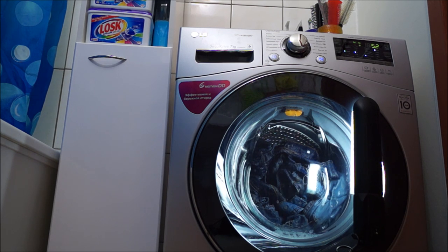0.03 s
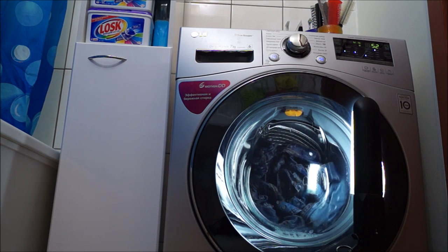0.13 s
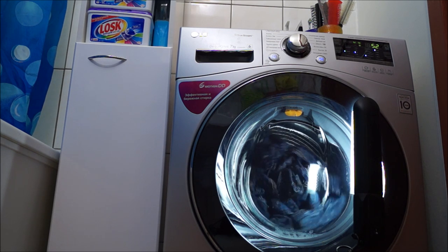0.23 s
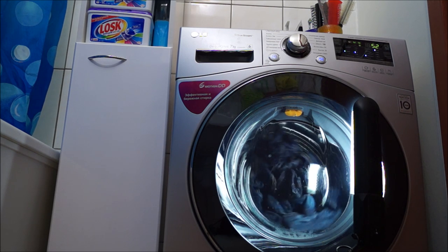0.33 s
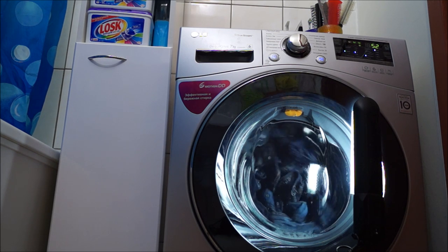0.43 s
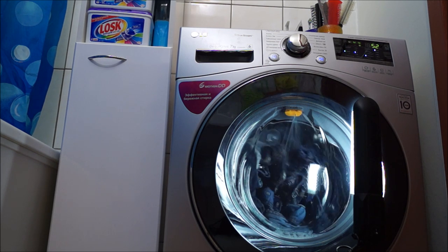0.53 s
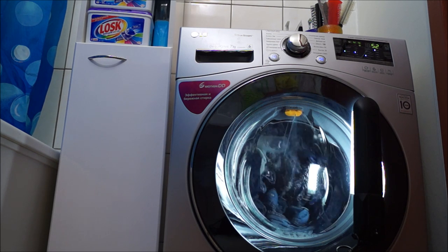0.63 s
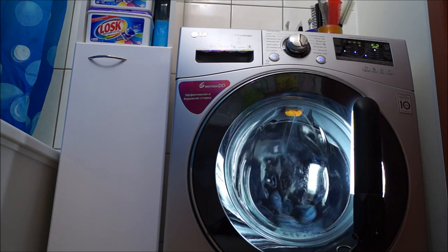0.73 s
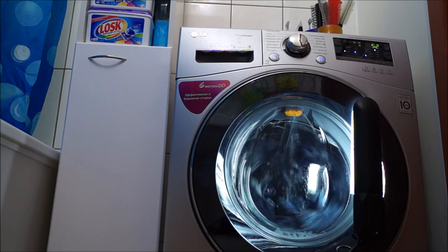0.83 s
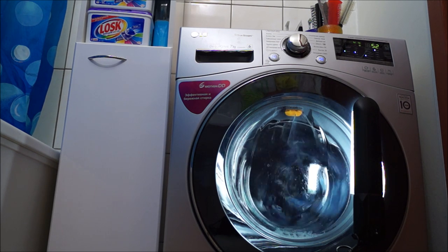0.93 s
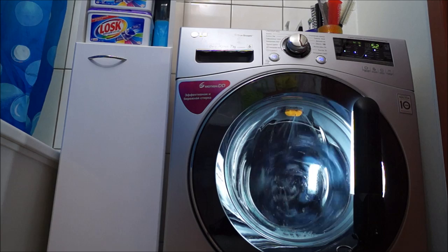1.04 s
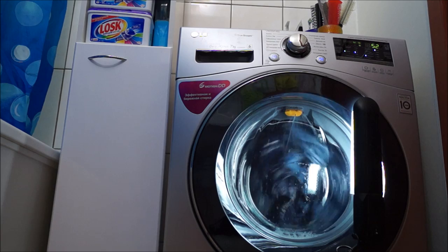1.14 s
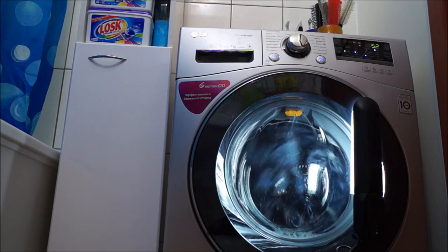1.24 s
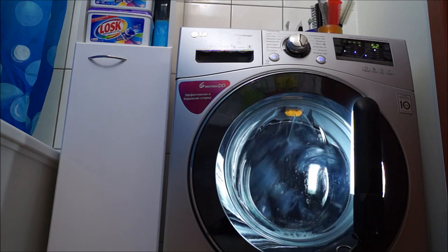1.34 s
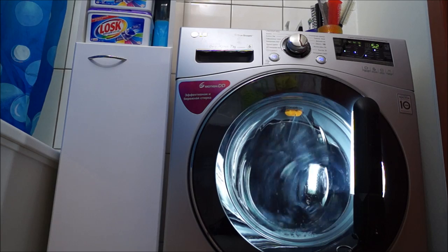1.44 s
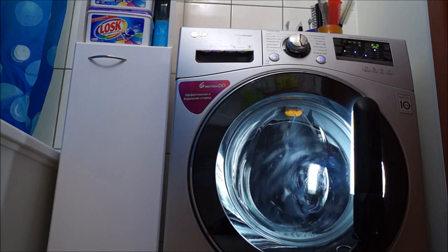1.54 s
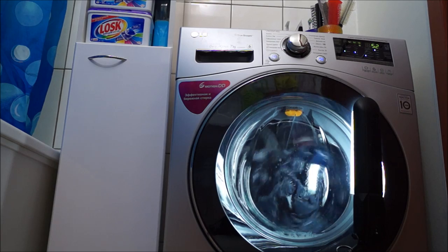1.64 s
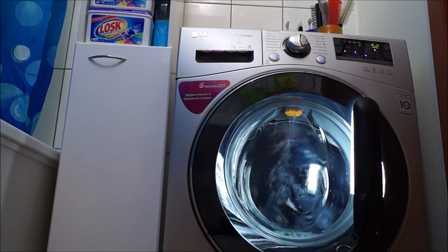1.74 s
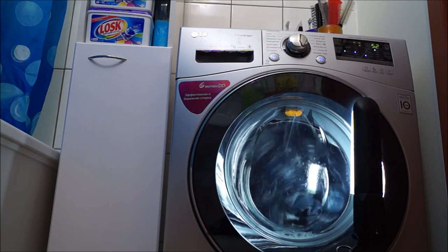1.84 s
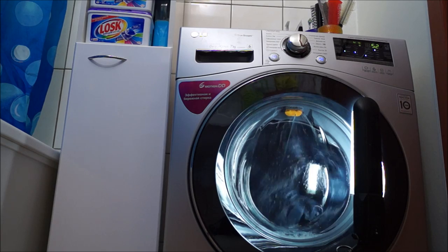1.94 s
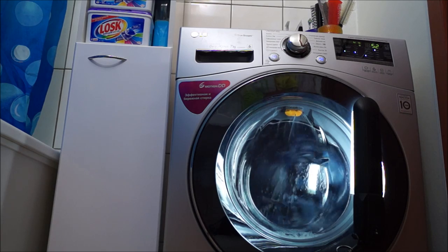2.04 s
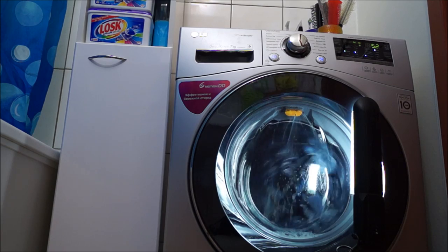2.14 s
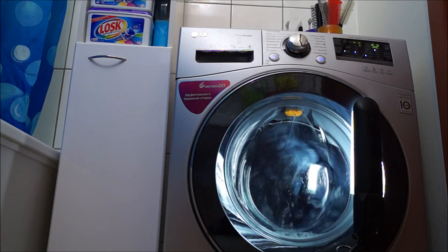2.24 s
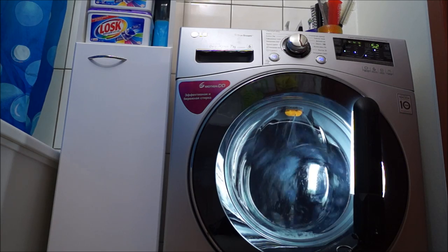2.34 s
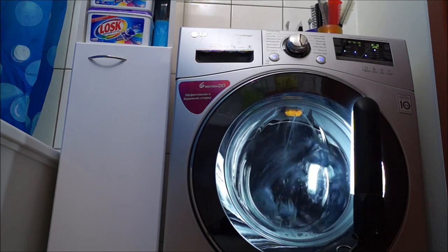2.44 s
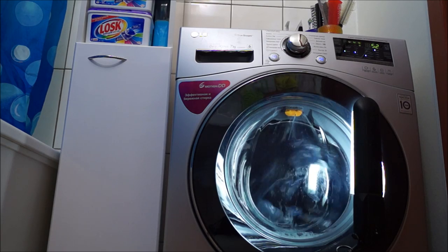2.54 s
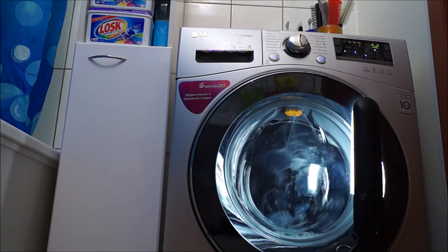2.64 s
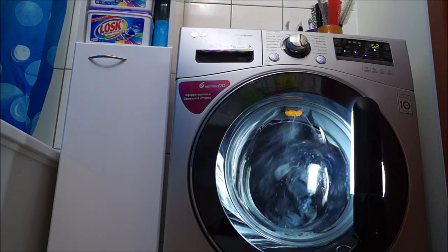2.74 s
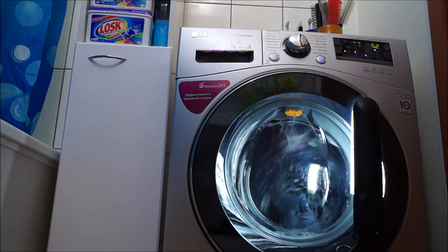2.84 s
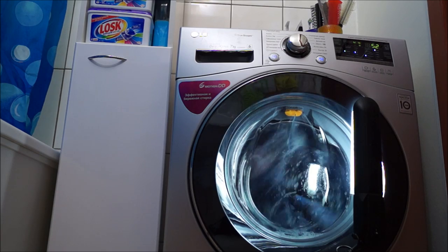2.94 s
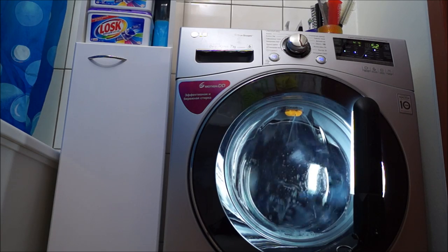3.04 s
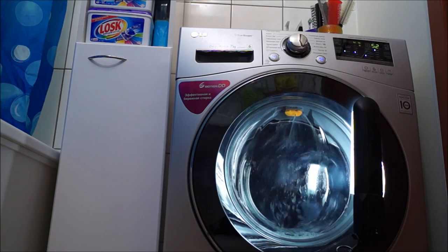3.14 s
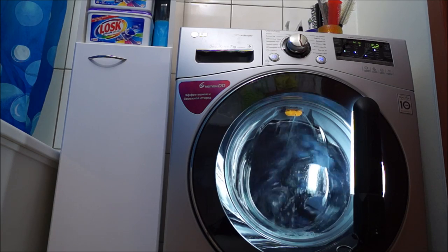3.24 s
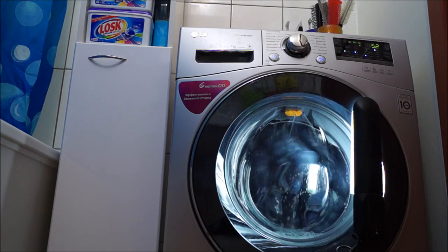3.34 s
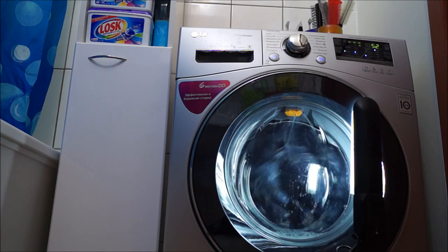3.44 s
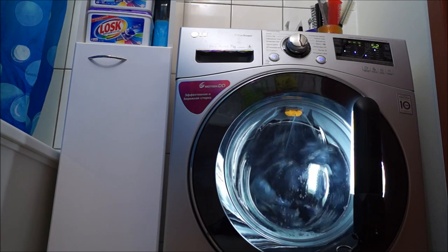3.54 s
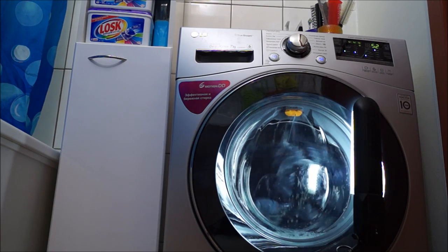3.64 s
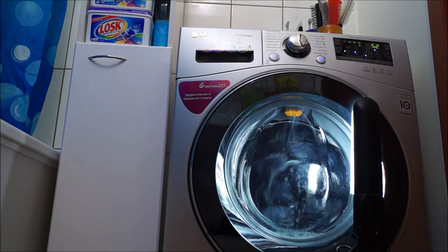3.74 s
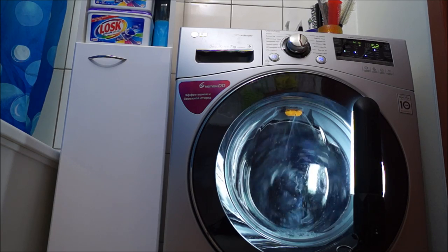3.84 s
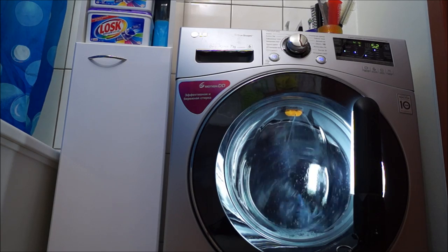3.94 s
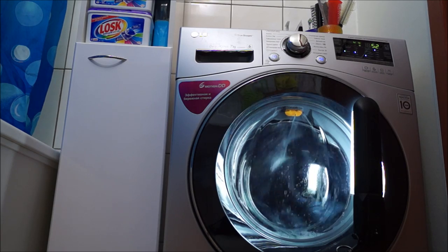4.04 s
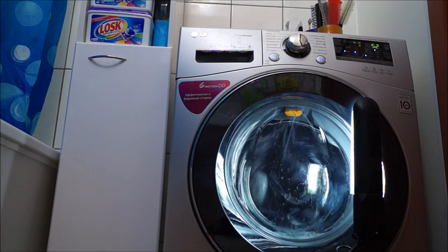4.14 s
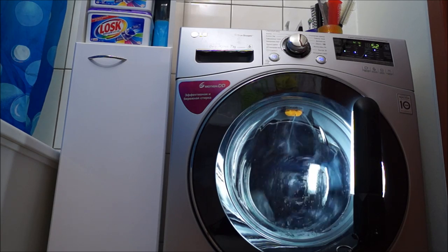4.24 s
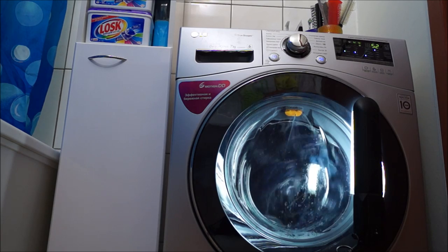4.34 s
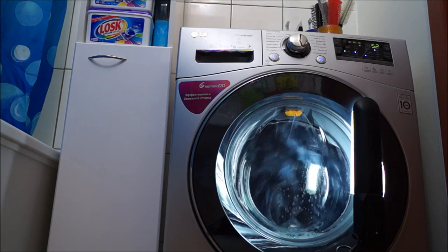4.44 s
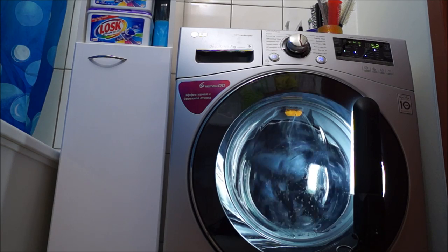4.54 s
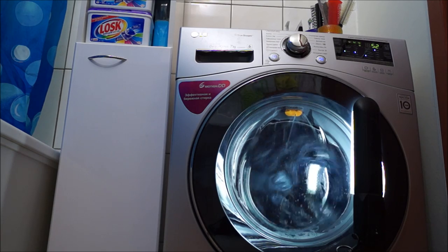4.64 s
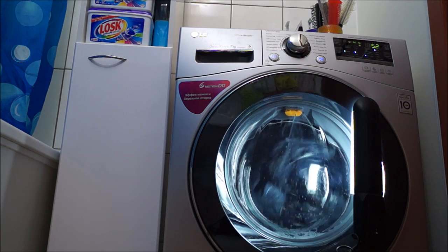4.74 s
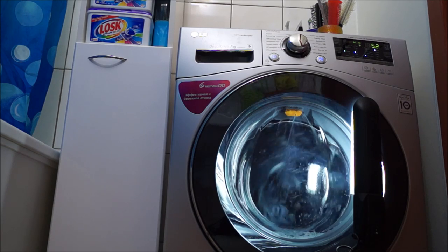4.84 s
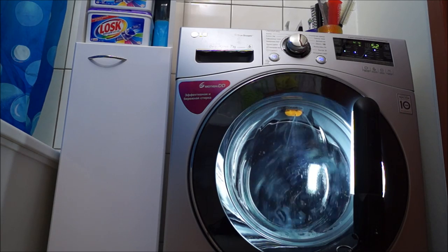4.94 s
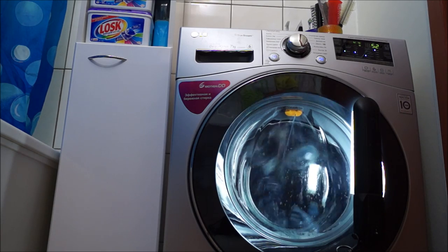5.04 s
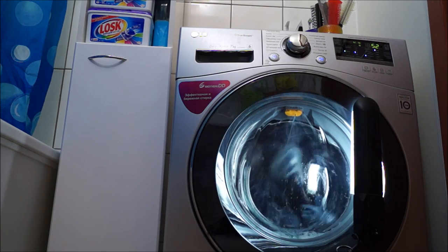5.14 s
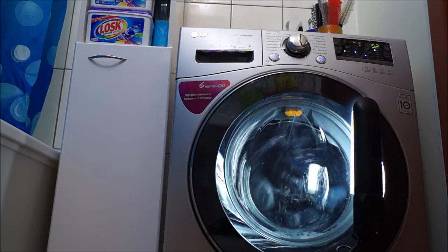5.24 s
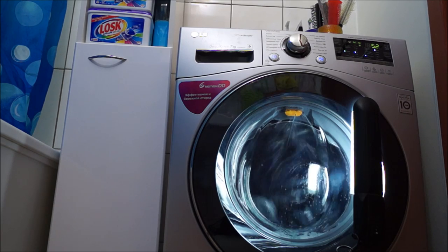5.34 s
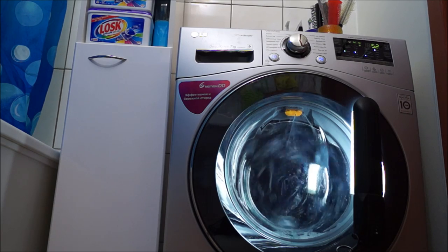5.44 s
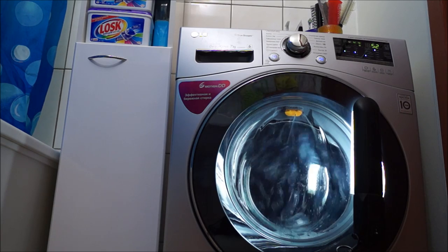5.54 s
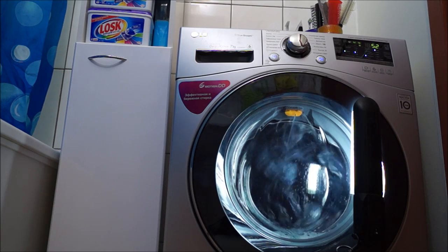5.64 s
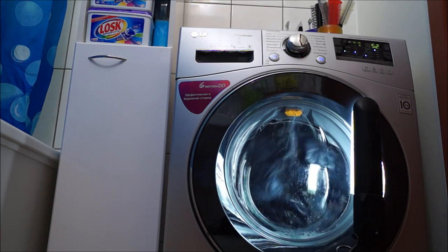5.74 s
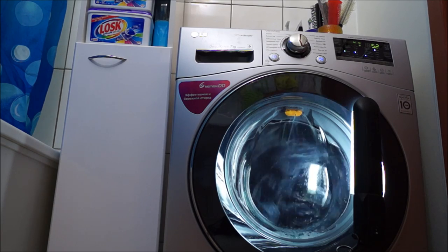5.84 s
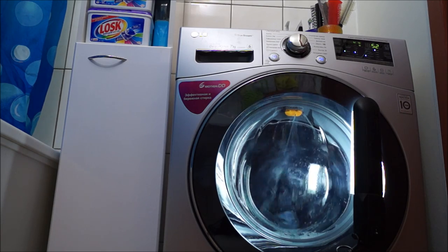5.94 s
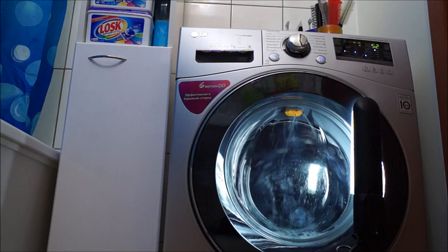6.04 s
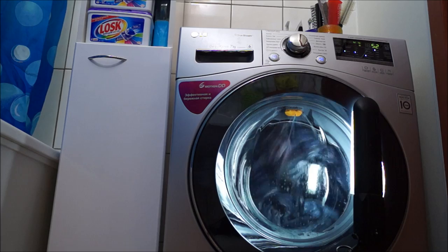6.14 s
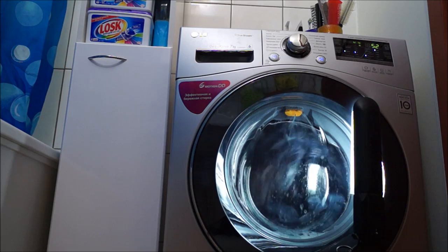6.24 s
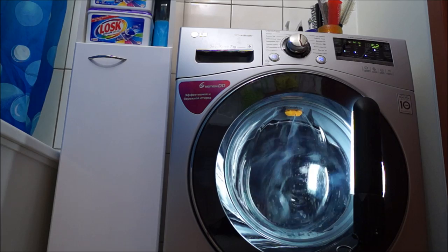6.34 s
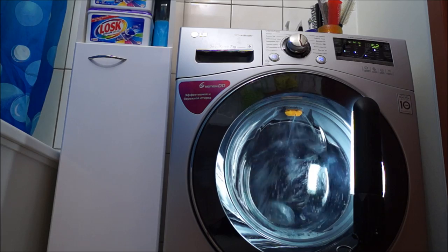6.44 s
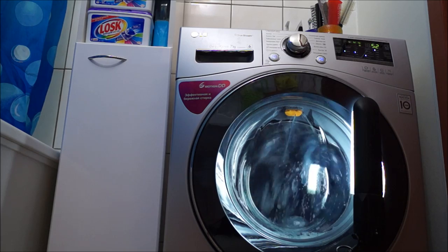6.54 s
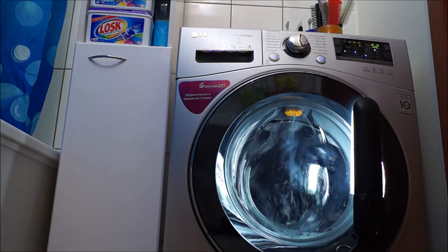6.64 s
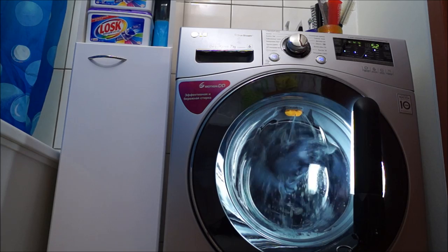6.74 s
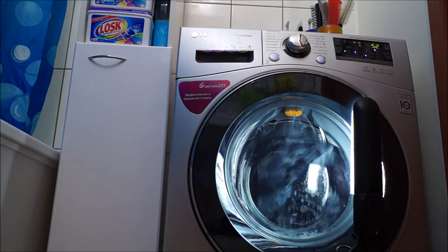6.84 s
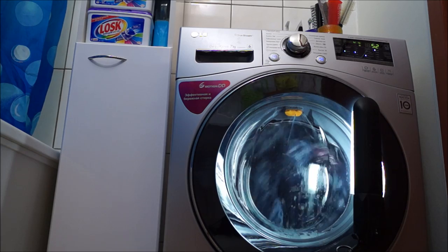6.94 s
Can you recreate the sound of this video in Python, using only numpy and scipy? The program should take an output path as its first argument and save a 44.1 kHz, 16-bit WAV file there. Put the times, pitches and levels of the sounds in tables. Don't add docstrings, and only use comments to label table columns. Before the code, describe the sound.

A front-loading washer hums and groans as wet laundry thuds and sloshes, with a buckle clatter and two sharp cracks on the door glass.

```python
import sys
import numpy as np
from scipy import signal
from scipy.fft import rfft, irfft, next_fast_len
from scipy.io import wavfile

SR = 44100
rng = np.random.default_rng(int(sys.argv[2]) if len(sys.argv) > 2 else 0)


def dump_mix(stems):
    frames = np.atleast_2d(stems).T
    limited = np.clip(frames, -1, 1)
    pcm = np.round(limited * 32767).astype(np.int16)
    wavfile.write(sys.argv[1], SR, pcm)


def invert_db(level):
    return 10 ** (np.asarray(level, dtype=float) / 20)


N = 308259
MAINS_HZ = 50

# (peak t/s, length/s, cabinet rumble level/dB, slosh level/dB)
SURGES = [(0.174, 0.07, -47, -46.5), (0.332, 0.11, -38, -59), (1.103, 0.22, -39, -55),
          (1.296, 0.16, -43, -52), (1.809, 0.43, -44, -73), (1.946, 0.081, -59.5, -58),
          (2.294, 0.15, -40.5, -53.5), (3.059, 0.086, -52, -51), (3.135, 0.11, -46, -51.5),
          (3.782, 0.061, -34, -72), (4.1, 0.15, -38.5, -58), (4.222, 0.092, -36, -55),
          (4.323, 0.16, -60, -57), (4.95, 0.49, -40.5, -60), (5.335, 0.2, -62, -57),
          (5.528, 0.057, -43, -59), (5.79, 0.13, -45, -57), (5.96, 0.16, -39.5, -71),
          (6.55, 0.19, -57, -60.5), (6.697, 0.14, -70, -58), (6.885, 0.097, -62, -60)]


def rms_one(x):
    return x / np.sqrt(np.mean(x ** 2) + 1e-20)


def at_hz(points, hz):
    point_hz, values = np.transpose(points)
    return np.interp(np.log(hz), np.log(point_hz), values)


def drift(rate):
    r = np.exp(-80 * np.pi * rate / SR)
    white = rng.standard_normal(N // 40 + 2002)
    slow = signal.lfilter([1], [1, -2 * r, r * r], white)[2000:]
    return np.interp(np.arange(N) / 40, np.arange(len(slow)), rms_one(slow))


def resonate(x, modes):
    out = 0
    for k, (hz, width, level_db) in enumerate(modes):
        r = np.exp(-np.pi * max(width, 3) / SR)
        b = (1 - r * r) / 2 * np.array([1, 0, -1])
        a = [1, -2 * r * np.cos(2 * np.pi * hz / SR), r * r]
        out = out + (-1) ** k * invert_db(level_db) * signal.lfilter(b, a, x + 1e-18)
    return out


def band(x, low_hz, high_hz):
    return signal.sosfilt(signal.butter(2, [low_hz, high_hz], "band", fs=SR, output="sos"), x)


def pair(hz, mid, side):
    # (f/Hz, likeness 0..1)
    likeness = [(60, 1), (140, 1), (340, 0.75), (820, 0.27), (1950, 0.63), (4640, 0.57), (11100, 0.71)]
    alike = np.clip(at_hz(likeness, hz), 0, 1)
    return np.sqrt(1 + alike) * mid + np.sqrt(1 - alike) * side * [[1], [-1]]


def dying(times, levels_db, t60s, rise_s):
    out = np.zeros(N)
    for s, level_db, t60 in zip(times, levels_db, t60s):
        t = np.arange(N - round(s * SR))[:SR // 2] / SR
        out[round(s * SR):][:len(t)] += invert_db(level_db - 60 * t / max(t60, .02)) * (1 - np.exp(-t / rise_s))
    return out


def swells(times, lengths, levels_db, rest_db):
    coarse = np.arange(0, N, 40)
    x = (coarse[:, None] / SR - times) / lengths
    x = np.clip(np.where(x < 0, -x / 0.93, x / 0.81), 0, 1)
    power = (invert_db(levels_db) * np.cos(np.pi / 2 * x) ** 2) ** 2
    return np.interp(np.arange(N), coarse, np.sqrt(power.sum(axis=1) + invert_db(rest_db) ** 2))


def banded_noise(spectrum, low_hz, count, patchy_db):
    out, together = 0, drift(17.0)
    edges = low_hz * 2 ** (np.arange(count + 1) / 2)
    white = rng.standard_normal((2, 2, N))
    for k, (low, high) in enumerate(zip(edges, edges[1:])):
        hz = np.sqrt(low * high)
        gain = invert_db(at_hz(spectrum, hz) + patchy_db * (together + .5 * drift(44.0)))
        out = out + gain * pair(hz, *band(white[k % 2], low, high))
    return rms_one(out)


def tone(hz, wander_hz, flutter_db):
    phase = 2 * np.pi * (np.cumsum(hz + wander_hz * drift(7.33)) / SR + rng.random())
    return np.sqrt(2) * invert_db(flutter_db * drift(4.9)) * np.sin(phase)


def quarter_turn(x):
    return signal.hilbert(x, next_fast_len(N)).imag[:N]


def startup():
    start_s = 0.053
    points_s = [0, start_s - .02, start_s, start_s + 0.004]
    return invert_db(np.interp(np.arange(N) / SR, points_s, [-20, -16, -14, -0.5]))


def water_level():
    # (t/s, level/dB)
    water = [(0.0, -73.5), (0.21, -72.5), (1.69, -71), (2.08, -69), (2.55, -69.5), (3.29, -67.5),
             (3.48, -68), (4.11, -69), (4.4, -65.5), (4.73, -68.5), (6.76, -67.5), (6.99, -68.5)]
    s, level_db = np.transpose(water)
    return np.interp(np.arange(N) / SR, s, level_db)


def faint_buzz():
    # (start t/s, length/s, level/dB)
    fourth_bouts = [
        (0.1, 0.09, -41),
        (3.005, 0.051, -41),
        (4.123, 0.13, -47),
        (5.148, 0.15, -38.5),
        (6.54, 0.036, -43),
        (6.668, 0.046, -43),
        (6.919, 0.04, -47),
    ]
    # (start t/s, length/s, level/dB)
    eleventh_bouts = [
        (3.015, 0.06, -59),
        (4.183, 0.06, -52),
        (5.184, 0.035, -42),
    ]
    out = 0
    for rows, multiple, wander_hz in [(fourth_bouts, 4, 1.7), (eleventh_bouts, 11, 3.03)]:
        s, length, level_db = np.transpose(rows)
        swell = swells(s + length / 2, length + 0.027, level_db - 2.0, -71.5)
        out = out + swell * tone(multiple * MAINS_HZ, wander_hz, flutter_db=-3.5)
    return out


def pump():
    # (multiple of the mains, rms level/dB)
    steady_buzz = [(2, -57.5), (3, -62), (4, -60), (7, -68), (9, -63), (10, -59.5), (11, -63), (17, -74.5)]
    # (start t/s, length/s, level/dB)
    sixth_bouts = [(1.04, 0.15, -38.5), (1.318, 0.021, -44), (1.678, 0.11, -39), (2.006, 0.13, -40),
                   (2.267, 0.041, -39), (2.885, 0.016, -39.5), (3.026, 0.035, -46), (3.124, 0.073, -45.5),
                   (4.012, 0.12, -38), (4.194, 0.082, -40), (4.418, 0.064, -41), (4.677, 0.098, -39.5),
                   (4.91, 0.069, -40.5), (5.111, 0.026, -40.5), (5.187, 0.059, -69), (5.288, 0.095, -40.5),
                   (5.433, 0.062, -41), (5.54, 0.039, -46), (5.979, 0.087, -39.5), (6.287, 0.036, -45),
                   (6.704, 0.11, -40.5), (6.811, 0.039, -39)]
    # (start t/s, length/s, level/dB)
    eighth_bouts = [(0.282, 0.17, -43), (0.618, 0.028, -39.5), (1.142, 0.092, -48), (1.276, 0.053, -41),
                    (1.49, 0.047, -36.5), (1.741, 0.18, -42.5), (1.965, 0.13, -39), (2.188, 0.061, -41),
                    (2.445, 0.16, -44), (2.691, 0.031, -40), (3.014, 0.2, -40.5), (3.543, 0.033, -43),
                    (3.651, 0.034, -45), (3.76, 0.16, -38), (4.01, 0.063, -50), (4.166, 0.098, -38),
                    (4.323, 0.036, -52.5), (4.589, 0.25, -39.5), (4.898, 0.051, -40), (5.267, 0.11, -39.5),
                    (5.429, 0.25, -40.5), (5.71, 0.11, -45), (5.86, 0.069, -42), (5.975, 0.17, -41.5),
                    (6.277, 0.042, -39.5), (6.373, 0.27, -40.5)]
    out = 0
    for k, level_db in steady_buzz:
        out = out + invert_db(level_db) * tone(k * MAINS_HZ, wander_hz=0.148 * k, flutter_db=4.5)
    s, length, level_db = np.transpose(sixth_bouts)
    sixth = swells(s + length / 2, length + 0.023, level_db - 3.0, rest_db=-54)
    s, length, level_db = np.transpose(eighth_bouts)
    eighth = swells(s + length / 2, length + 0.012, level_db - 3.0, rest_db=-53.5)
    out = out + sixth * tone(6 * MAINS_HZ, wander_hz=2.03, flutter_db=3.0)
    return out + eighth * tone(8 * MAINS_HZ, wander_hz=1.4, flutter_db=0.03)


def groans():
    # (peak t/s, length/s, peak level/dB, f/Hz)
    low_bouts = [(.22, 0.14, -41, 112.4), (1.06, 0.12, -47, 119), (1.48, 0.096, -36, 119.2),
                 (1.70, 0.24, -41.5, 115.3), (2.01, 0.24, -40.5, 118.2), (2.92, 0.14, -37.5, 116),
                 (3.09, 0.11, -28, 117.2), (3.28, 0.24, -42.5, 119.4), (3.51, 0.16, -44.5, 115.3),
                 (4.07, 0.11, -36.5, 116), (4.25, 0.21, -36.5, 116.8), (4.54, 0.077, -34.5, 113.6),
                 (4.9, 0.11, -39.5, 113.9), (5.17, 0.078, -41, 118.7), (5.32, 0.18, -32, 118.5),
                 (5.55, 0.26, -49, 121), (5.73, 0.23, -45, 108.3), (5.94, 0.11, -39, 111.9),
                 (6.2, 0.16, -43.5, 112), (6.43, 0.16, -43, 112), (6.68, .26, -37.5, 116)]
    # (peak t/s, length/s, peak level/dB, f/Hz)
    high_bouts = [(.138, 0.037, -32.5, 158.2), (.38, 0.26, -45, 158.2), (.79, 0.12, -41, 170),
                  (.97, 0.11, -39, 156.7), (1.02, .05, -33, 158.4), (1.1, 0.091, -24, 166.6),
                  (1.155, 0.026, -25, 169.5), (1.97, 0.1, -50, 157.8), (2.28, 0.12, -38, 158.1),
                  (2.47, 0.48, -41.5, 151), (2.97, 0.23, -42, 171.5), (3.2, 0.061, -37, 147),
                  (3.62, 0.12, -41.5, 160.3), (3.78, 0.3, -36.5, 158.6), (4.22, 0.21, -38.5, 171.2),
                  (4.52, 0.12, -42, 167.2), (4.85, 0.44, -48.5, 165), (5.02, 0.22, -36, 164.8),
                  (5.11, .07, -38, 165.7), (5.65, 0.36, -42.5, 165), (5.8, .1, -47, 156),
                  (6.0, .1, -46, 165), (6.29, 0.17, -37, 163), (6.47, 0.29, -39, 169.3),
                  (6.76, 0.14, -44.5, 169.3), (6.92, 0.3, -37.5, 158.6)]
    out = 0
    for rows in (low_bouts, high_bouts):
        s, length, level_db, hz = np.transpose(rows)
        swell = swells(s, length, level_db - 4.0, rest_db=-65)
        swell = np.minimum(swell, invert_db(-33.0))
        out = out + swell * tone(np.interp(np.arange(N) / SR, s, hz), wander_hz=1.372, flutter_db=1.5)
    return out


def spray(water_db):
    # (f/Hz, density/dB per Hz)
    hiss_colour = [(820, -30), (1400, 4.5), (1700, -2.5), (3200, -8), (3610, -8), (8050, -15), (10500, -15),
                   (11200, -24), (14600, -54), (22000, -120)]
    return invert_db(water_db + 4.5) * banded_noise(hiss_colour, 1344, count=6, patchy_db=1.06)


def slosh(fill_db):
    # (f/Hz, density/dB per Hz)
    slosh_colour = [(24, -52), (40, -20), (97, 2.5), (134, -1.5), (241, -4.5), (299, -4), (348, -11),
                    (405, 0.5), (703, -16), (846, -16.5), (2200, -35.5), (2860, -66), (4840, -120)]
    s, length, _, level_db = np.transpose(SURGES)
    surge = invert_db(0.94 * fill_db + 13.5) * swells(s, length, level_db, rest_db=-59.5)
    wash = surge * banded_noise(slosh_colour, 44.0, count=11, patchy_db=1.86)
    return signal.sosfilt(signal.butter(6, 2050, fs=SR, output="sos"), wash)


def cabinet(fill_db, opening):
    # (t/s, peak level/dB, ring/s)
    thuds = [(0.136, -52, 0.11), (1.069, -30.5, 0.071), (1.162, -38, .05), (1.201, -36, 0.055),
             (1.276, -36, 0.16), (1.95, -53, 0.17), (2.269, -46, 0.15), (2.294, -31, 0.054),
             (3.0186, -22, 0.13), (4.193, -20, 0.06), (4.2075, -28, 0.05), (4.225, -32, 0.05),
             (4.237, -43, .06), (5.176, -26.5, 0.11), (5.743, -36, 0.15), (6.528, -33, 0.31),
             (6.691, -42, 0.17)]
    # (f/Hz, width/Hz, level/dB)
    panels = [(63.4, 4.6, -33), (86, 5.3, -6.5), (116, 54, -4), (156, 53.4, -7), (202, 14, 0),
              (262.8, 26.5, -3.5), (297.3, 33.3, -0.5), (332.6, 29.5, -3.5), (409.5, 24.6, 3),
              (443, 56.8, 0.5), (491, 51.7, -3.5), (567.6, 59, -9), (614, 140, -21), (777.3, 9.5, -12.5),
              (848, 21, -17.5)]
    s, length, level_db, _ = np.transpose(SURGES)
    rumble = invert_db(0.34 * fill_db) * swells(s, length, level_db, rest_db=-42)
    s, level_db, t60 = np.transpose(thuds)
    force = rumble * invert_db(-5.0 + 3.05 * drift(24.0)) * opening
    force = force + dying(s, level_db - 18.5, t60, rise_s=0.0051)
    size = np.sqrt(np.mean(resonate(rng.standard_normal(SR), panels) ** 2))
    mid, side = resonate(force * rng.standard_normal((2, N)), panels) / size
    push = band(dying(s, level_db, .012 + 0 * s, rise_s=0.00031), 78, 1100)
    shudder = invert_db(-15.5) * resonate(push, panels) / size
    return pair(140, mid, side) / np.sqrt(2) + shudder + invert_db(7.0) * band(push, 120, 600)


def splashes():
    # (peak t/s, length/s, dull level/dB, bright level/dB)
    sheets = [(0.497, .03, -61, -79), (0.521, 0.036, -57, -59), (0.715, 0.027, -64, -71),
              (1.08, 0.034, -73, -78), (1.13, 0.041, -70, -77), (1.23, 0.023, -61, -77),
              (1.275, 0.037, -57, -73), (1.336, 0.037, -56, -70), (1.66, 0.049, -62.5, -70),
              (2.939, 0.024, -53, -67), (3.3, .04, -69, -72), (4.05, 0.054, -64, -72),
              (4.515, .08, -56, -73), (5.695, .06, -54, -72), (5.872, 0.054, -57, -68),
              (6.017, 0.034, -60, -69), (6.156, 0.044, -61, -72), (6.34, 0.049, -69, -76),
              (6.539, 0.054, -55, -75), (6.719, 0.064, -62, -75), (6.788, 0.024, -54.5, -67)]
    s, length, dull_db, bright_db = np.transpose(sheets)
    drops_per_s = 2500
    drops = rng.standard_normal((2, N)) * (.3 + (rng.random((2, N)) < drops_per_s / SR) * 3.0)
    dull = rms_one(pair(1300, *band(band(drops, 550, 1720), 550, 1720)))
    bright = rms_one(pair(4600, *band(drops[::-1], 2300, 5800)))
    return swells(s, length, dull_db, -90) * dull + swells(s, length, bright_db, -96) * bright


def drips():
    # (t/s, peak level/dB, f/Hz)
    gulps = [(0.4795, -48, 1090), (1.0627, -51, 1160), (1.2159, -52, 1000), (1.6514, -52, 1020),
             (2.0624, -49, 931), (2.2405, -35, 1310), (2.7993, -53, 1030), (3.0168, -43, 2290),
             (3.2208, -49, 910), (3.4079, -46, 1530), (4.2949, -32, 2270), (4.4989, -48, 1220),
             (4.7947, -47, 921), (4.9698, -49, 1030), (5.1689, -40, 2270), (5.3066, -27, 2260),
             (5.6328, -46, 985), (5.8603, -48, 1020), (5.9995, -49, 1310), (6.5163, -46, 950),
             (6.655, -46, 926), (6.7757, -49, 1060)]
    out, t = np.zeros(N + SR), np.arange(SR // 8) / SR
    for s, level_db, hz in gulps:
        fall_db = 60 * t * hz / 42
        fall = invert_db(min(level_db, -50.0) - 5 - fall_db) * (1 - np.exp(-t / .0015))
        out[round(s * SR):][:len(t)] += fall * np.sin(2 * np.pi * hz * t * (1 + 1.5 * t))
    return out[:N]


def tub():
    # (t/s, peak level/dB, f/Hz)
    knocks = [(0.176, -30.5, 486), (0.289, -39, 425), (0.316, -43, 498), (1.071, -31, 507),
              (1.153, -34, 464), (1.168, -34, 526), (1.202, -31.5, 431), (1.278, -27.5, 490),
              (1.329, -38, 426), (1.479, -45, 416), (1.644, -42, 495), (1.959, -37, 522), (2.062, -38, 500),
              (2.269, -28, 458), (3.02, -30.5, 346), (3.035, -33, 436), (3.408, -33.5, 499),
              (4.1935, -30, 470), (4.2085, -26, 515), (4.2275, -30, 400), (4.2365, -27, 425),
              (5.174, -28, 431), (6.145, -36, 500), (6.338, -38, 540), (6.536, -45, 433), (6.689, -43, 520)]
    out, t = np.zeros(N + SR), np.arange(SR // 4) / SR
    for s, level_db, hz in knocks:
        peak_db = level_db - 2.5
        ring = invert_db(peak_db - 60 * t / 0.09) * (1 - np.exp(-t / 0.00056)) * np.sin(2 * np.pi * hz * t)
        overtone = invert_db(peak_db - 8.5 - 60 * t / 0.035) * np.sin(2 * np.pi * 1.327 * hz * t)
        out[round(s * SR):][:len(t)] += ring + overtone
    return out[:N]


def slaps():
    # (t/s, peak level/dB, dull part level/dB, dying/s, ring f/Hz)
    heavy_slaps = [
        (0.0585, -40.5, 6, 0.12, 4100),
        (0.08, -39, 6.5, 0.43, 3820),
        (0.1285, -32, -1, 0.16, 6240),
        (0.479, -62.5, 19.5, 0.49, 3700),
        (0.519, -51, 10, 0.25, 4400),
        (2.242, -48, 20, 0.24, 3700),
        (2.2897, -57.5, 15, 0.44, 4000),
        (3.0164, -45, -7, 0.16, 4850),
    ]
    # (t/s, peak level/dB, dull part level/dB)
    spatters = [(0.3347, -58, -17), (0.715, -58, 10), (0.851, -57, -4), (1.071, -70, 13), (1.089, -52, -9),
                (1.262, -69, 1), (1.3143, -53.5, 12), (1.687, -51, -12), (1.951, -66, 15),
                (2.768, -56, -16), (2.94, -62, 18), (3.06, -49, -16.5), (3.22, -45.5, -7), (3.755, -52, 9),
                (4.143, -44.5, 0), (4.1918, -68, 8), (4.5614, -45.5, 0), (4.9641, -48.5, 6),
                (5.254, -50, -11), (5.6068, -52, 4), (5.6293, -44.5, 3.5), (5.999, -48.5, 2),
                (6.365, -48.5, 5), (6.6904, -61.5, 21), (2.064, -47, 3), (3.4125, -48, 6.5),
                (4.43, -44.5, -9), (4.794, -43, 2.5), (5.147, -51, -9), (6.6115, -45, -42)]
    light = [(*row, 0.17, 4180, 0) for row in spatters]
    out, t = np.zeros(N + SR), np.arange(SR // 2) / SR
    for s, level_db, dull_db, t60, hz, steel in [(*row, 1) for row in heavy_slaps] + light:
        white = rng.standard_normal((2, len(t))) * invert_db(0.39 * drift(170.0)[:len(t)])
        spatter = rms_one(band(white[0], 1250, 10800 - 4500 * steel))
        ring = rms_one(resonate(white[0], [(hz, 450, 0)]))
        bright = (1 - 0.078 * steel) * spatter + (0.075 + 0.27 * steel) * ring
        dull = rms_one(band(band(white[1], 440, 1840), 440, 1840))
        fall = invert_db(-60 * t / max(t60, .02)) * (1 - np.exp(-t / 0.00032))
        out[round(s * SR):][:len(t)] += invert_db(level_db - 12.0) * fall * (bright + invert_db(dull_db + 0.5) * dull)
    return out[:N]


def crack(blows, modes, t60, gain_db, hard=0.38, tick_s=0.064, spike_db=-60, click_db=-40):
    s, level_db = np.transpose(blows)
    heard = slice(round(s[0] * SR), round((s[-1] + .5) * SR))
    rattle = dying(s, level_db - 2.5, t60 + 0 * s, rise_s=0.00087)
    rattle = rattle + dying(s, level_db + 3, tick_s + 0 * s, rise_s=0.000043)
    tail = dying(s, level_db + 4, 1.4 * t60 + 0 * s, rise_s=0.0022)
    spike = dying(s, level_db + spike_db, 0.013 + 0 * s, rise_s=0.0002)
    white, out = rng.standard_normal((2, N)), np.zeros(N)
    blow = white[0] * rattle
    blow[np.round(s * SR).astype(int)] += invert_db(level_db + click_db)
    body = resonate(blow[heard], modes) / np.std(resonate(white[0, :SR // 4], modes))
    dense = band((white[0] * rattle + white[1] * tail)[heard], 1850, 5400)
    out[heard] = body + hard * dense + band((white[1] * spike)[heard], 2500, 16000)
    return invert_db(gain_db) * out


def opening_knocks():
    # (t/s, peak level/dB)
    opening_hits = [
        (0.0582, -38.5),
        (0.0823, -46),
        (0.1287, -48),
    ]
    # (f/Hz, width/Hz, level/dB)
    opening_ring = [(1800, 180, 0), (2960, 330, -9), (3600, 120, -1), (3940, 190, 3), (4300, 120, 3),
                    (5760, 220, -18.5), (6660, 400, -12), (7500, 300, -13)]
    return crack(opening_hits, opening_ring, 0.13, gain_db=-8.0, hard=0.089, tick_s=.05, click_db=16.0)


def buckle():
    # (t/s, peak level/dB)
    drum_hits = [
        (2.2365, -45),
        (2.243, -48),
        (2.262, -54),
        (2.294, -65),
    ]
    # (f/Hz, width/Hz, level/dB)
    drum_ring = [(1050, 940, -10), (1550, 370, 2), (2060, 520, -14), (3700, 290, -2), (4110, 570, -8),
                 (4750, 510, -33)]
    return crack(drum_hits, drum_ring, 0.21, gain_db=-12.5, hard=.04, click_db=9.0)


def glass_knocks():
    # (t/s, peak level/dB)
    soft_knocks = [
        (3.0168, -49.5),
        (5.1673, -45.5),
    ]
    # (f/Hz, width/Hz, level/dB)
    soft_ring = [(1535, 49, 8.5), (1870, 24, 4), (2210, 31.3, 6.5), (2403, 50, 6), (4046, 170, -15),
                 (5320, 110, -16)]
    # (t/s, peak level/dB)
    thud_knock = [
        (4.191, -44),
        (4.2075, -60),
        (4.225, -63),
    ]
    # (f/Hz, width/Hz, level/dB)
    thud_ring = [(853, 73, -9), (1280, 90, -5), (1500, 70, 5), (2150, 90, -8), (2550, 70, -4)]
    soft = crack(soft_knocks, soft_ring, 0.3, gain_db=-5.5, hard=.02, click_db=22.0)
    return soft + crack(thud_knock, thud_ring, 0.1, gain_db=-10.5, hard=.03, click_db=19.0)


def fastener():
    # (t/s, peak level/dB)
    graze = [
        (4.2775, -34),
        (5.3005, -35),
    ]
    # (t/s, peak level/dB)
    first_blows = [
        (4.2947, -16.5),
        (4.2995, -28),
    ]
    # (t/s, peak level/dB)
    later_blows = [
        (5.3056, -20),
    ]
    # (t/s, peak level/dB)
    last_blows = [
        (6.6553, -40.5),
    ]
    # (f/Hz, width/Hz, level/dB)
    first_ring = [(1470, 380, 4), (2310, 250, 7), (3420, 600, -16), (4150, 1030, 6), (5050, 450, 10.5),
                  (6140, 200, 10), (6800, 640, 4.5), (7600, 170, 9.5), (9200, 330, 8), (10270, 730, -2)]
    later_ring = [(1530, 210, 0), (1793, 52, 0), (2214, 37, 12), (2420, 73, 9), (3390, 28, 12.5),
                  (3660, 50, 9), (3830, 180, -4), (4830, 150, 5.5), (5120, 160, 2.5), (6250, 170, -3),
                  (5780, 85, 6), (7500, 350, -0.5), (8900, 500, -1), (10100, 450, -2.5)]
    last_ring = [(2270, 135, 2), (3450, 260, 5.5), (3840, 200, 4), (4900, 200, 6.5), (5880, 180, 6.5),
                 (7440, 250, 1), (9050, 400, -5), (10000, 400, -8), (1400, 610, 0)]
    first_tail = [(2250, 740, -10), (4320, 570, 3), (5050, 460, 4), (6200, 900, -3), (8760, 1500, -6)]
    later_tail = [(1700, 470, 3), (3518, 500, -1), (4700, 900, -6), (5960, 600, 2), (7400, 600, 2),
                  (9000, 1500, -14)]
    blows = crack(graze, first_ring, 0.024, gain_db=-23.0, tick_s=.022, spike_db=8)
    blows = blows + crack(first_blows, first_ring, 0.17, gain_db=-15.5, tick_s=0.033, spike_db=-1.0, click_db=8.0)
    blows = blows + crack(first_blows, first_tail, 0.52, gain_db=-36.0, hard=.1, tick_s=0.29)
    blows = blows + crack(later_blows, later_ring, 0.26, gain_db=-11.0, click_db=22.5)
    blows = blows + crack(last_blows, last_ring, 0.27, gain_db=-11.0, hard=0.32, click_db=15.0)
    lingering = [crack(later_blows, later_tail, 0.38, gain_db=-27.5, hard=.1, tick_s=0.32) for side in range(2)]
    return blows, np.array(lingering)


def bathroom(x):
    t60_s = 0.069
    size = next_fast_len(N + SR)
    w, spectrum = 2 * np.pi * np.arange(size // 2 + 1) / size, rfft(x, size)
    out = np.zeros((2, N))
    all_lags = (rng.uniform(0.0058, 0.029, (2, 8)) * SR).astype(int)
    for side, lags in enumerate(all_lags):
        loops = [invert_db(-60 * lag / SR / t60_s) * np.exp(-1j * w * lag) for lag in lags]
        echoes = sum(g / (1 - g) * (-1) ** k for k, g in enumerate(loops))
        out[side] = irfft(spectrum * echoes, size)[:N]
    return out / 2


def scene():
    opening = startup()
    water_db = water_level()
    fill_db = water_db - np.median(water_db)
    hum = pump() + groans()
    hum = hum + .17 * quarter_turn(hum) * [[1], [-1]]
    body = opening * (hum + faint_buzz()) + spray(water_db) + np.sqrt(opening) * slosh(fill_db)
    body = body + cabinet(fill_db, opening) + splashes() + drips() + tub()
    blows, lingering = fastener()
    hits = slaps() + opening_knocks() + buckle() + glass_knocks() + blows
    wall_echo = invert_db(-23) * np.roll(hits, round(.006 * SR))
    wide = invert_db(-8.0) * quarter_turn(hits) + wall_echo
    near = body + hits + wide * [[1], [-1]] + invert_db(-5) * bathroom(hits) + lingering
    return near * invert_db(np.array([[-.3], [.3]]))


def low_pass(x):
    return signal.sosfilt(signal.butter(12, 11200, fs=SR, output="sos"), x)


def record(dry):
    x = signal.sosfilt(signal.butter(2, 60, "high", fs=SR, output="sos"), dry)
    x = signal.sosfilt(signal.ellip(10, .5, 30, 11080, fs=SR, output="sos"), x)
    return low_pass(x)


dry = scene()
out = record(dry)
dump_mix(out)
```